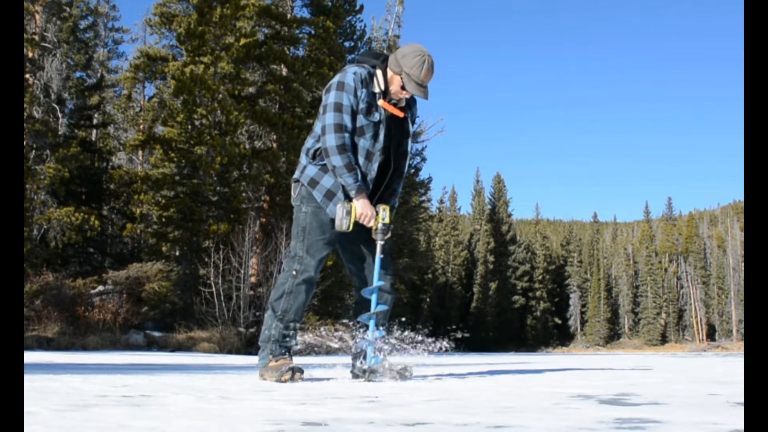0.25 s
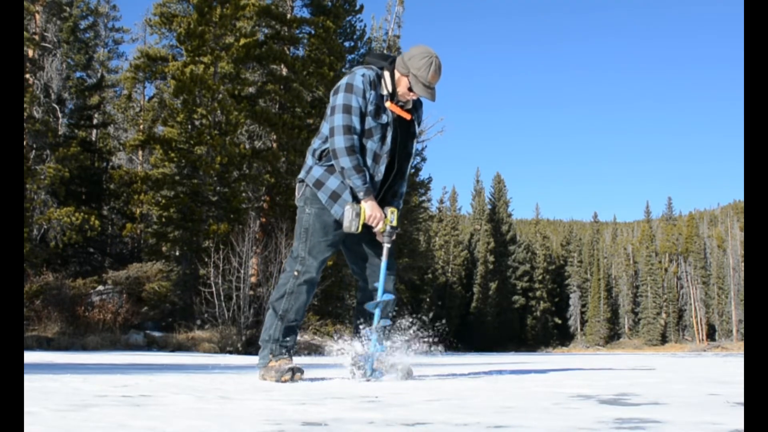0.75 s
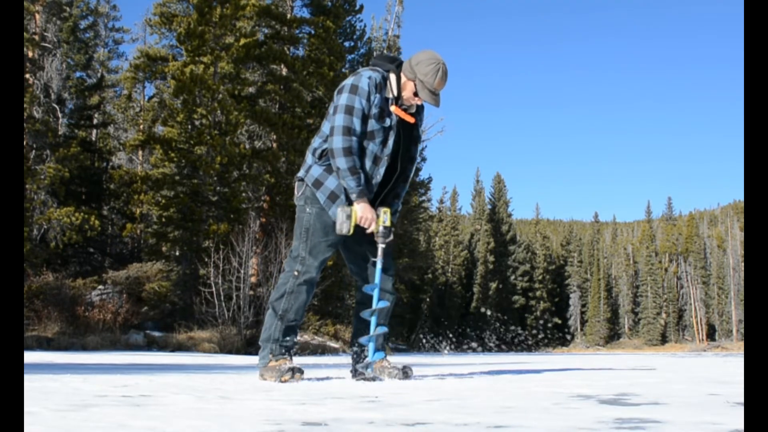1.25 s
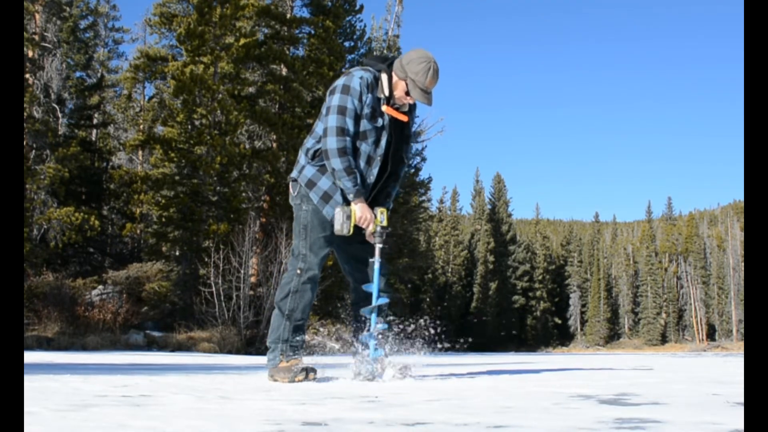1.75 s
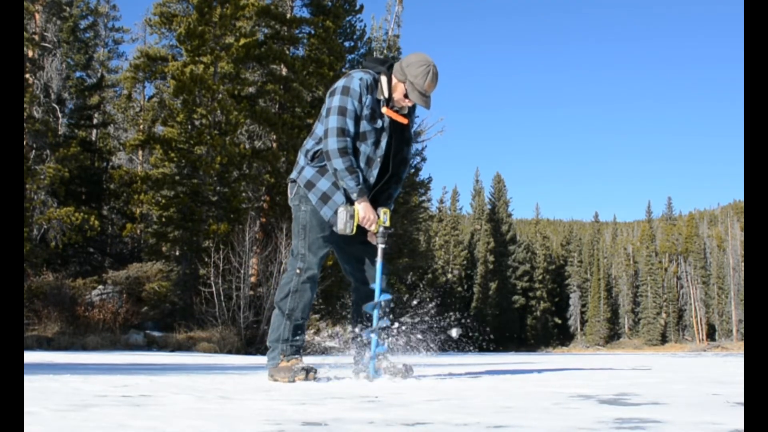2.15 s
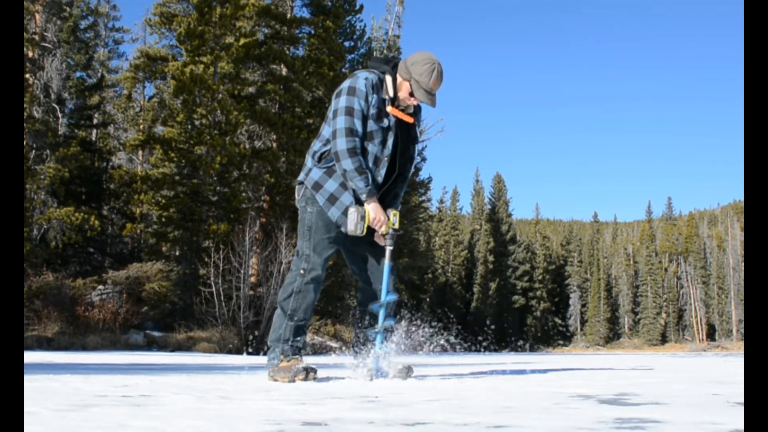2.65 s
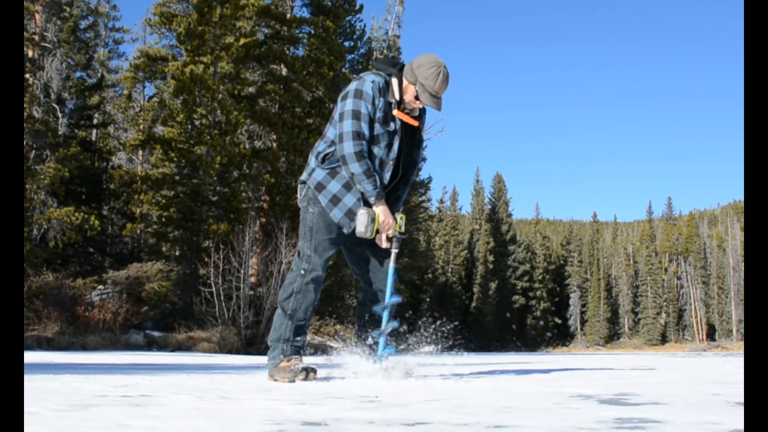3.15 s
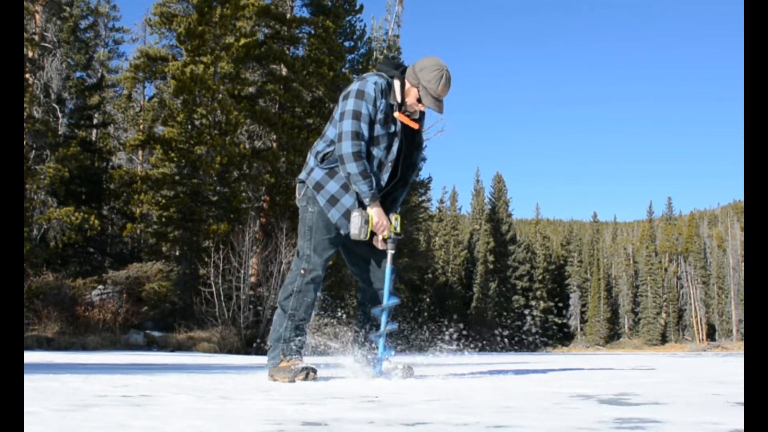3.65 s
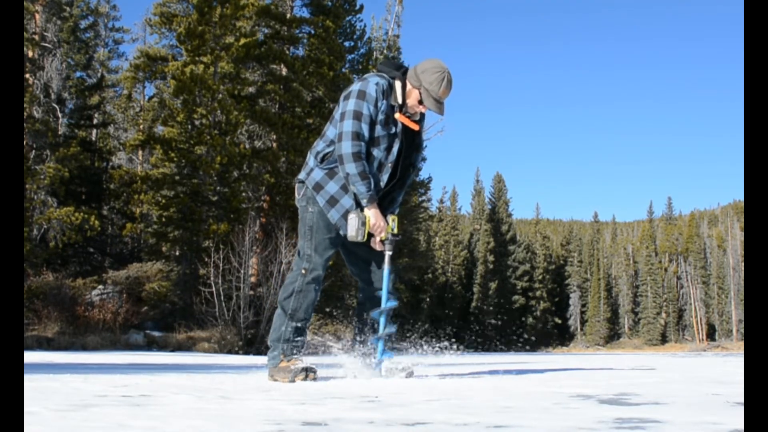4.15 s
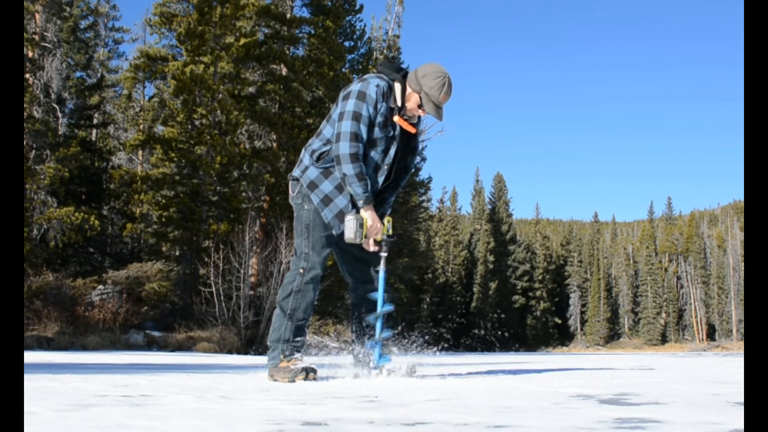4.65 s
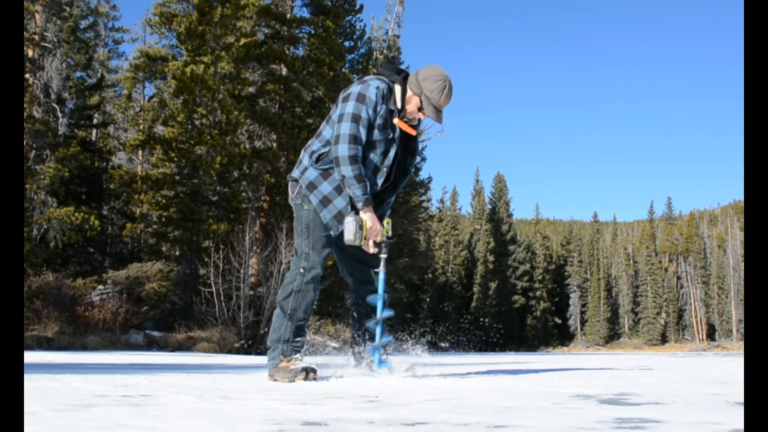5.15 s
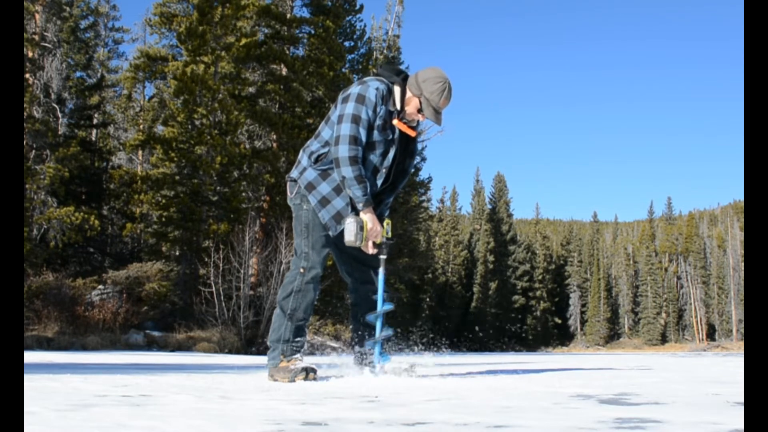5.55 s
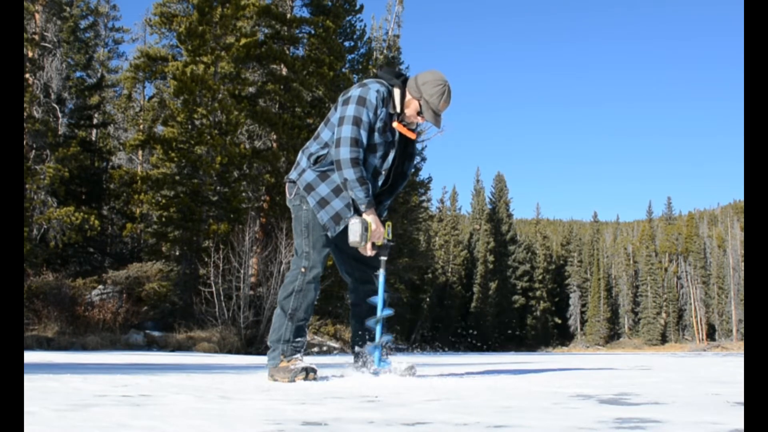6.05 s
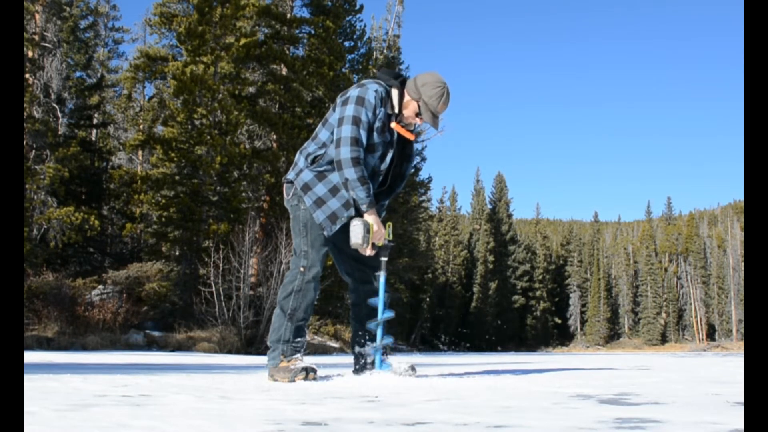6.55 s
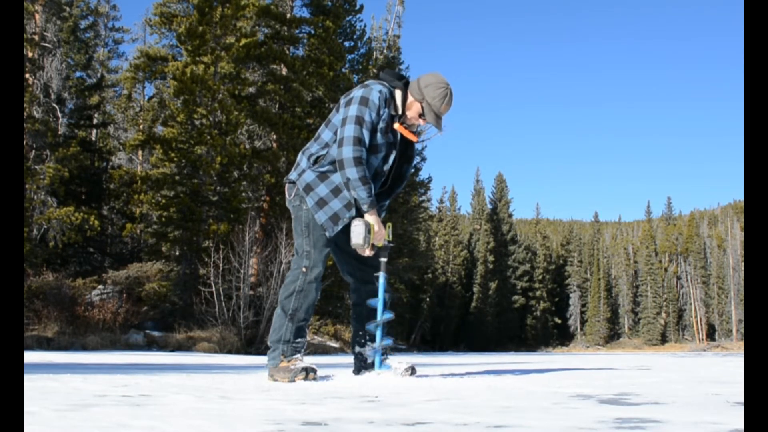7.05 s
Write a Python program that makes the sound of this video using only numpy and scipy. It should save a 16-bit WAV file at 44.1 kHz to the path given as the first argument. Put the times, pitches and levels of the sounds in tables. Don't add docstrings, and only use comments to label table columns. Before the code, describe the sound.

A cordless drill turns a steel auger on a frozen lake. Short, rasping bursts start with little squeals and metallic rings and stop abruptly; boots knock dully on the ice in a gap. Then one long loaded cut runs to the end, a fast buzzing chatter with gritty grinding, spraying ice and a hollow boom sinking in pitch. Single close microphone, quiet open air, slight short scatter from the shore.

```python
import sys
import numpy as np
from scipy import signal
from scipy.fft import rfft, irfft
from scipy.io import wavfile
from scipy.ndimage import uniform_filter1d

SR = 44100
rng = np.random.default_rng(int(sys.argv[2]) if len(sys.argv) > 2 else 0)


def file_out(sig):
    cols = np.atleast_2d(sig).T
    lim = np.clip(cols, -1, 1)
    pcm = np.round(lim * 32767).astype(np.int16)
    wavfile.write(sys.argv[1], SR, pcm)


def volts(x):
    e = np.asarray(x, float) / 20
    return 10 ** e


N = 321930
T = np.arange(N) / SR

# start [t/s], length [t/s], cutting force at start [level/dB], at end [level/dB]
TRIGGER_PULLS = [
    (-.02, 0.15, -12, -18.5),
    (0.235, 0.18, -14.5, -16),
    (0.524, 0.14, -15.5, -14),
    (0.785, 0.15, -14.5, -13.5),
    (1.058, 0.024, -12, -13),
    (1.433, .2, -17.5, -13.5),
    (1.778, .21, -18.5, -14),
    (2.126, .2, -17.5, -15.5),
    (2.449, 0.3, -15, -17),
    (2.852, 4.5, -15, -15.5),
]
STOP_FALL = [(0.0057,), (0.017,), (0.018,), (0.015,)]
# time [t/s], buried share of the blades [0-1], change of force, up or down [level/dB]
SINKING = [(0, 0.17, 0), (1.1, 0.02, 0), (1.6, 0.27, 1), (2.3, 0.1, 0), (2.8, 0.58, 2), (3.3, 0.4, -1.5),
           (3.7, 0.86, -1.5), (4.5, 1, -2.5), (6, 0.86, -3), (7.1, 0.91, -2.5), (7.3, 0.84, -5)]
SURFACE_MIX = [(1,), (-5,), (-10.5,), (-16.5,)]
BURIED_MIX = [(0,), (-11,), (0,), (-28.5,)]
# time [t/s], boost [level/dB], length [t/s]
JOLTS = [
    (3.38, 1, 0.0096),
    (4.58, 5, 0.017),
    (7.132, 3.5, 0.14),
]
JOLT_SHARE = [(0.65,), (1.8,), (0.43,), (3,)]
# time [t/s], blows a second [f/Hz]
CHATTER_RATE = [(0, 91), (.2, 90), (.25, 84.5), (.8, 82.5), (.95, 89), (1.7, 92), (1.8, 85), (2.0, 86),
                (2.15, 93), (2.4, 88.5), (2.75, 87), (3.1, 82.5), (3.35, 95), (4.0, 87), (4.8, 85.5),
                (5.9, 86), (6.4, 89.5), (7.3, 91)]
# mode [f/Hz], width [f/Hz], [level/dB]
SNAP_MODES = [(2149, 477, 12), (2524, 320, 2.5), (3200, 200, -13.5), (1060, 1200, -30)]
# [f/Hz], width [f/Hz], [level/dB], swing per turn [level/dB], its phase [rad],
# swing per half turn [level/dB], its phase [rad], wander [level/dB]
STEEL_MODES = [ (1000, 80, -4.5, 10, 3.4, 6.5, 2.3, 1.5), (1200, 70, -4, 1, 4.2, 3, 2.3, 3),
               (1460, 80, -2.5, 2, 2.8, 5.5, 2.6, 2.5), (1800, 50, -8, 1, .1, 1.2, .1, 4),
               (2260, 150, -1.5, 1.5, .4, 1.2, 1.9, 3), (2640, 110, -1.5, 2.5, .1, .7, -1.3, 3),
               (3750, 120, -13, .6, .5, .3, 1.2, 4.5), (4950, 160, -9, 3, 1.3, 1.2, -2.6, 4.5),
               (5300, 140, -13, 3, 1.3, 1.2, -2.6, 4.5), (6650, 200, -15, .6, -.7, .4, 3.1, 4.5),
               (7290, 90, -15, .6, -.7, .4, 3.1, 4.5), (11900, 500, -19, .6, .6, .4, 3.1, 3)]
# [f/Hz], density [level/dB]
GRIND_COLOUR = [(150, -34), (400, -11.5), (700, -3.5), (1000, -0.5), (1600, -0.5), (2400, -5.5), (3300, -9),
                (4500, -21), (7000, -62)]
# [f/Hz], density [level/dB]
SPRAY_COLOUR = [(1760, -27), (3000, 6), (3770, 0), (4410, 0), (4890, 2.5), (5650, -9), (7190, -4.5),
                (9670, -43.5), (12300, -0.5), (15600, -59)]
# time [t/s], boost [level/dB], length [t/s]
SPURTS = [
    (5.854, 12, 0.017),
    (6.096, 13, 0.023),
    (6.274, 11, 0.024),
    (6.441, 13, 0.018),
    (6.569, 16.5, 0.014),
    (6.772, 14.5, 0.018),
    (6.94, 11.5, 0.066),
    (7.162, 9, 0.035),
]
# [f/Hz], width [f/Hz], [level/dB]
SHAFT_MODES = [(675.5, 61.5, 1), (783.6, 23, 1.5)]
# time [t/s], [f/Hz], [level/dB]
AIR_COLUMN = [(0, 820, -20), (3, 820, -45), (4.5, 713, -15), (5.7, 610, -1.5), (7.3, 543, -1.5)]
# time [t/s], [f/Hz]
SHEET_PITCH = [(0, 277), (5.5, 250), (6.5, 315), (7.3, 304)]
# time [t/s], [level/dB]
GEAR_WHINE = [(0, -48), (3.5, -32), (5, -45), (6.2, -32), (7.3, -30)]
# [f/Hz], density [level/dB]
FLAKE_COLOUR = [(2500, -20), (5000, -1.5), (8000, -12.5), (12000, -9), (15500, -12)]
# [f/Hz], density [level/dB]
AIR_COLOUR = [(18, -32), (30, -23), (89, -9), (139, -10.5), (346, 1.5), (415, -4.5), (460, 0.5),
              (837, -2.5), (1410, -8), (2250, -11), (8470, -34.5), (15000, -28)]
# time [t/s], peak [level/dB], length [t/s]
BITES = [(0.227, -19.5, 0.043), (0.508, -14.5, 0.052), (0.779, -16, 0.044), (1.051, -15.5, 0.016),
         (1.424, -13, 0.029), (1.77, -7.5, 0.024), (2.1, -25.5, 0.014), (2.128, -10, 0.021),
         (2.449, -16, 0.045), (2.832, -28, .004), (2.841, -22, .008), (2.856, -19, 0.035)]
# [f/Hz], width [f/Hz], [level/dB]
SQUEAL_MODES = [(2707, 223, 13), (2914, 21, -1.5)]
# time [t/s], [level/dB], [f/Hz], length [t/s]
RINGS = [(0.386, -24, 1540, 0.026), (0.66, -31, 3760, 0.015), (0.822, -26, 1530, 0.14),
         (1.061, -19.5, 1476, 0.015), (1.068, -17.5, 1222, 0.014), (1.445, -19, 1470, 0.0081),
         (1.508, -15.5, 1280, 0.022), (1.596, -21.5, 1813, 0.047), (2.458, -20, 1485, 0.074),
         (2.696, -20, 1475, 0.042), (2.992, -18, 2214, 0.036), (3.157, -14.5, 1200, 0.038),
         (3.324, -16.5, 2295, 0.06), (7.173, -42, 4840, 0.058)]
# time [t/s], peak [level/dB], [f/Hz]
KNOCKS = [
    (.739, -39, 500),
    (1.28, -9.5, 403),
    (1.283, -7, 950),
    (1.287, -13, 1900),
    (1.327, -8, 1320),
    (1.329, -3.5, 520),
    (1.335, -16, 216),
]
# time [t/s], [level/dB], length [t/s]
SCUFFS = [
    (0.745, -27.5, 0.006),
    (0.76, -32, 0.01),
    (1.157, -42, 0.02),
    (1.208, -28.5, 0.006),
    (1.364, -29.5, 0.0045),
]
# [f/Hz], density [level/dB]
SCUFF_COLOUR = [(30, -40), (300, -1), (1500, -1.5), (3000, -4), (7000, -13.5), (15500, -21)]


def evened(x):
    return x / np.sqrt(np.mean(x ** 2) + 1e-20)


def curve(rows):
    s, *columns = np.transpose(rows)
    return [np.interp(T, s, column) for column in columns]


def coloured(points):
    f, db = np.transpose(points)
    hz = np.fft.rfftfreq(N, 1 / SR)
    gain = volts(np.interp(np.log(hz + 1), np.log(f + 1), db))
    return evened(irfft(rfft(rng.standard_normal(N)) * gain, N))


def wander(hz):
    f = np.fft.rfftfreq(N, 1 / SR)
    return evened(irfft(rfft(rng.standard_normal(N)) / (1 + (f / hz) ** 4), N))


def resonate(x, hz, width):
    turn = np.exp(2j * np.pi * np.cumsum(hz * np.ones(len(x))) / SR)
    r = np.exp(-np.pi * width / SR)
    return 2 * (turn * signal.lfilter([1 - r], [1, -r], x / turn)).real


def resonate_twice(x, hz, width):
    return evened(resonate(resonate(x, hz, width), hz, width))


def body(x, modes):
    return evened(sum(volts(db) * resonate_twice(x, hz, width * 1.5) for hz, width, db in modes))


def swell(s, length, rise=.004, fall=.008):
    return np.clip((T - s) / rise, 0, 1) * np.exp(-np.clip(T - s - length, 0, 1) / fall)


def swells(events, rise, fall):
    return sum(volts(db) * swell(s, length, rise, fall) for s, db, length in events)


def turning(harmonic, phase):
    turns_per_s, hurry_s, hurry_turns_per_s = 5.7, 5.5, .15
    turns = turns_per_s * (T - 5) + hurry_turns_per_s * np.clip(T - hurry_s, 0, None)
    return np.cos(2 * np.pi * harmonic * turns + phase)


def pace():
    turn_swing = 3 * turning(1, 0) + 1.5 * turning(2, -1.6)
    return curve(CHATTER_RATE)[0] + turn_swing + .8 * wander(hz=20)


def effort():
    spin_up_s, arch_db, arch_s = 0.021, -2.5, 0.047
    buried, change_db = curve(SINKING)
    pulls = np.zeros((4, N))
    for s, length, start_db, end_db in TRIGGER_PULLS:
        along = np.clip((T - s) / length, 0, 1)
        easing = np.clip(1 - (s + length - T) / arch_s, 0, 1)
        force_db = start_db + (end_db - start_db) * along + arch_db * easing
        pulls += volts(force_db) * swell(s, length, spin_up_s, np.array(STOP_FALL))
    jolt_db = sum(db * swell(s, length, rise=.01, fall=0.018) for s, db, length in JOLTS)
    surface_db = np.array(SURFACE_MIX)
    mix_db = surface_db + (np.array(BURIED_MIX) - surface_db) * buried
    return pulls * volts(change_db + mix_db + np.array(JOLT_SHARE) * jolt_db)


def chatter(rate):
    count = np.floor(np.cumsum(rate) / SR + .018 * wander(hz=60))
    slips = np.diff(np.maximum.accumulate(count), prepend=count[0]) > 0
    return evened(-1. * slips * volts(1.6 * wander(hz=70)))


def cutting(blows, flare, spurts_db):
    rub = .15 + .85 * curve(SINKING)[0]
    grit = rng.standard_normal(N) * (1 + 0.42 * flare)
    steel = 0
    for hz, width, db, once_db, once_phase, twice_db, twice_phase, wander_db in STEEL_MODES:
        swing_db = once_db * turning(1, once_phase) + twice_db * turning(2, twice_phase)
        mode_db = db + rub * swing_db + wander_db * wander(hz=16)
        steel = steel + volts(mode_db) * evened(resonate(grit, hz, width))
    snaps = body(blows, SNAP_MODES) * volts(4.8 * rub * turning(1, -.1) + 1.5 * wander(hz=12))
    grind = coloured(GRIND_COLOUR) * volts(.7 * spurts_db + 1.5 * wander(hz=25))
    return volts(-6.5) * snaps + volts(-4.5) * evened(steel) + volts(-8) * grind


def ice_spray(flare, spurts_db):
    drift_db = 2.06 * wander(hz=23.3) + 0.76 * turning(harmonic=0.99, phase=0.3)
    return coloured(SPRAY_COLOUR) * (0.5 + 0.058 * flare) * volts(-1.5 + spurts_db + drift_db)


def hole_boom(push):
    column_hz, column_db = curve(AIR_COLUMN)
    column = resonate_twice(push, column_hz, 200)
    lean_db = np.clip((720 - column_hz) / 30, -3, 3)
    lower = volts(-1.5 + lean_db) * body(push, SHAFT_MODES[:1])
    upper = volts(-3.5 - lean_db) * body(push, SHAFT_MODES[1:])
    return volts(-3.0) * (lower + upper + volts(column_db) * column) * volts(2.45 * wander(hz=29.5))


def ice_sheet(push):
    sheet_hz, = curve(SHEET_PITCH)
    hum = evened(resonate(resonate(push, sheet_hz, 296), sheet_hz, 284))
    return signal.sosfilt(signal.butter(3, 190, "high", fs=SR, output="sos"), hum)


def gear_whine(rate, force):
    mesh = resonate(rng.standard_normal(N), 35 * uniform_filter1d(rate, size=4000), 25)
    return volts(curve(GEAR_WHINE)[0]) * evened(mesh) * (force > .03)


def auger():
    force, spray, hole, ice = effort()
    rate = pace()
    blows = chatter(rate)
    fade = np.exp(-np.arange(600) / SR / 0.0055)
    flare = evened(signal.oaconvolve(-blows, fade)[:N])
    spurts_db = sum(db * swell(s, length, rise=0.014, fall=0.0084) for s, db, length in SPURTS)
    push = .95 * blows + .27 * rng.standard_normal(N)
    cut = force * cutting(blows, flare, spurts_db) + spray * ice_spray(flare, spurts_db)
    return cut + hole * hole_boom(push) + ice * ice_sheet(push) + gear_whine(rate, force)


def flakes():
    flakes_per_s, fade_s = 30, 0.011
    size_db = 5.7 * np.minimum(rng.exponential(1, N), 3)
    snaps = (rng.random(N) < flakes_per_s / SR) * volts(size_db)
    puffs = signal.oaconvolve(snaps, np.exp(-np.arange(4000) / SR / fade_s))[:N]
    return volts(-8.5) * effort()[1] * evened(puffs) * coloured(FLAKE_COLOUR)


def still_air():
    return volts(-35.5 + 1.54 * wander(hz=27)) * coloured(AIR_COLOUR)


def shore(x):
    t = np.arange(SR // 4) / SR
    tail = rng.standard_normal(len(t)) * volts(-60 * t / 0.17) * (t > .003)
    return signal.oaconvolve(x, tail / np.linalg.norm(tail))[:N]


def squeals():
    slips = rng.standard_normal(N) * volts(5.2 * wander(hz=163))
    return body(slips, SQUEAL_MODES) * swells(BITES, rise=0.0094, fall=0.009)


def rings():
    noise = rng.standard_normal(N)
    out = np.zeros(N)
    for s, db, hz, length in RINGS:
        out += volts(db) * swell(s, length, rise=0.0045, fall=0.013) * body(noise, [(hz, 45, 0)])
    return out


def boots():
    scuffing = coloured(SCUFF_COLOUR) * volts(2.8 * wander(hz=200))
    out = scuffing * swells(SCUFFS, rise=0.00086, fall=0.011)
    for s, db, hz in KNOCKS:
        t = np.clip(T - s, 0, 1)
        tone = np.sin(2 * np.pi * hz * t) * np.exp(-t * hz / 0.67)
        out = out + volts(db) * tone * np.clip(t / 0.00025, 0, 1)
    return out


def scene():
    near = auger() + squeals() + rings() + boots()
    return (near + volts(-12.5) * shore(near) + still_air() + flakes())[None]


def top_cut(x):
    return signal.sosfilt(signal.butter(12, 15710, fs=SR, output="sos"), x)


def record(dry):
    dull = signal.sosfilt(signal.butter(2, 12500, fs=SR, output="sos"), dry)
    mix = 1.207 * np.tanh(dull / 1.127)
    return top_cut(mix)


dry = scene()
out = record(dry)
file_out(out)
```